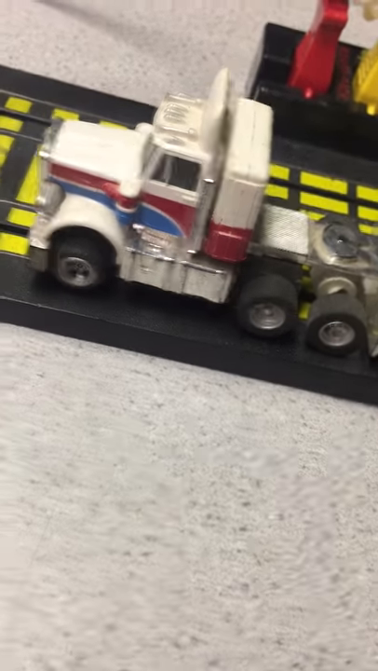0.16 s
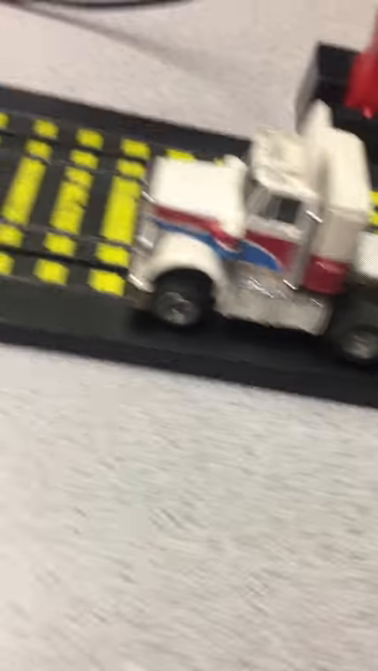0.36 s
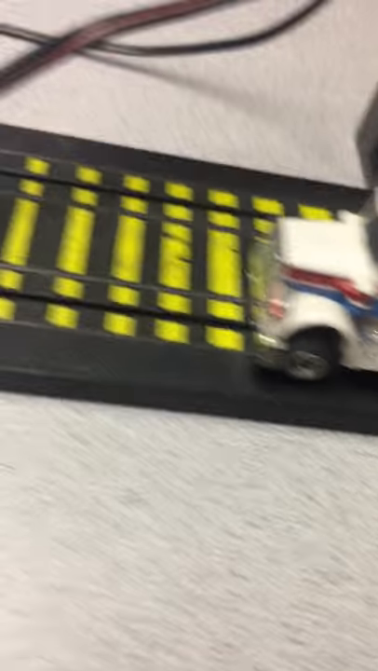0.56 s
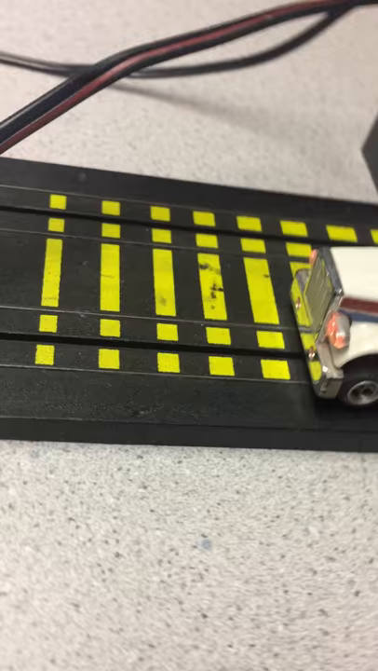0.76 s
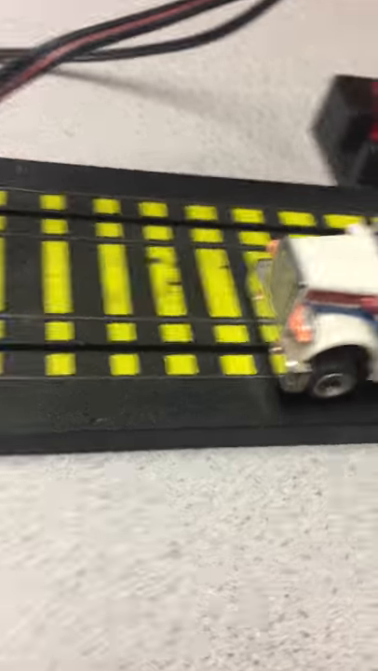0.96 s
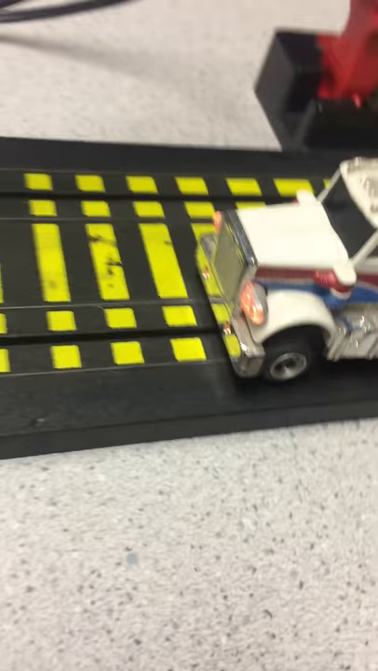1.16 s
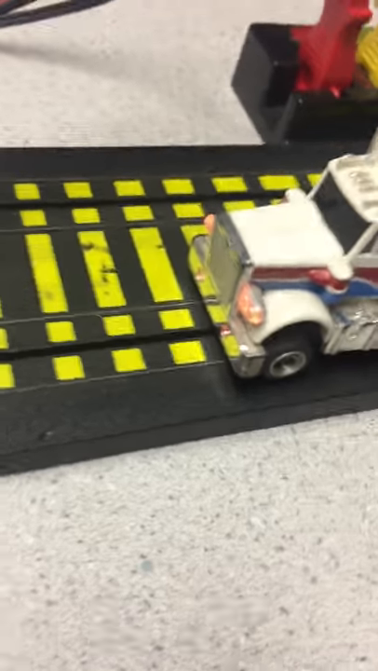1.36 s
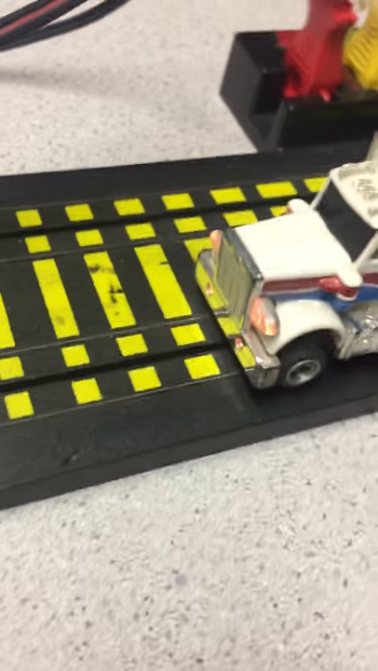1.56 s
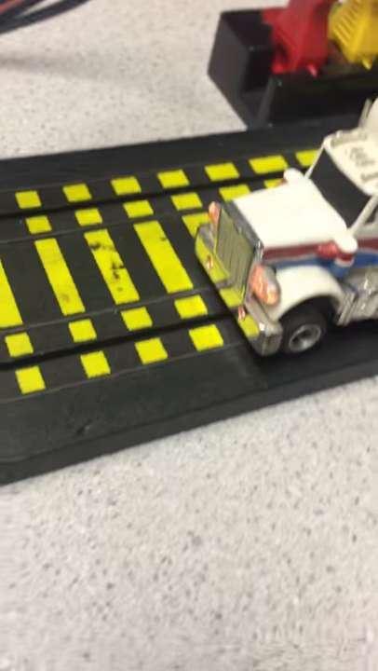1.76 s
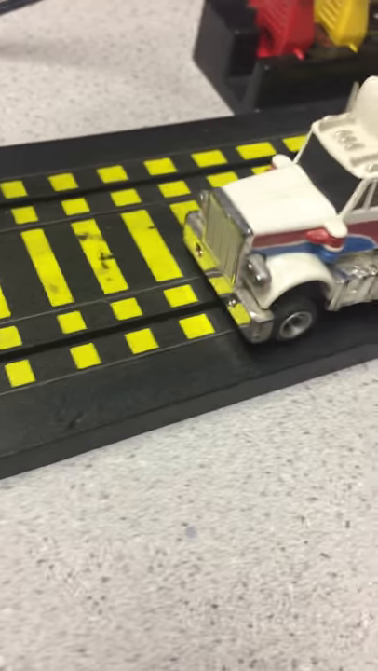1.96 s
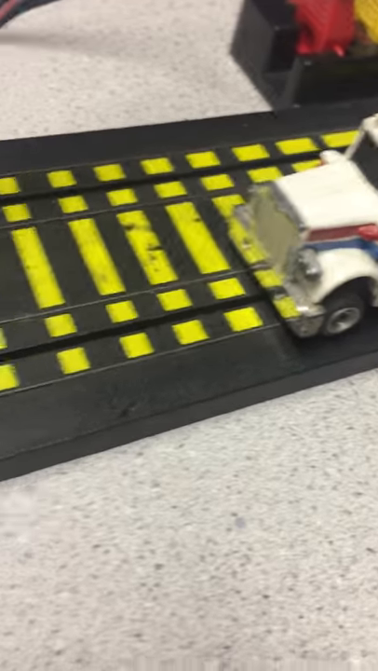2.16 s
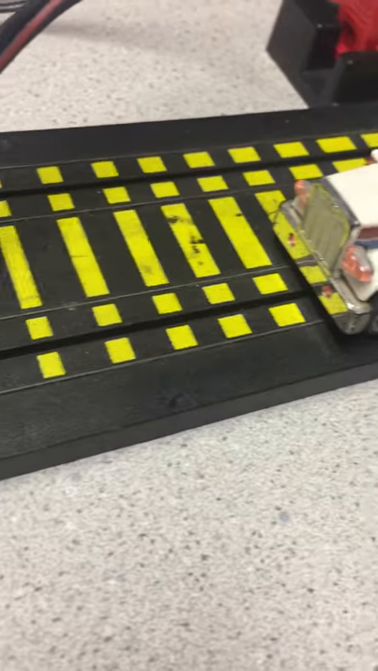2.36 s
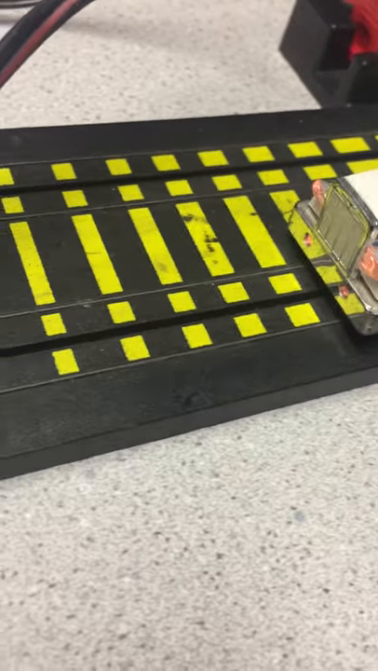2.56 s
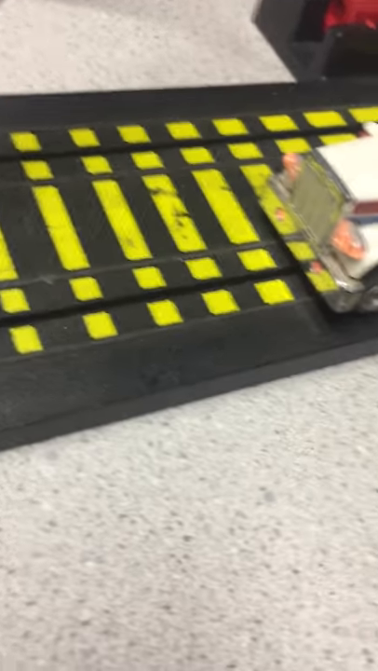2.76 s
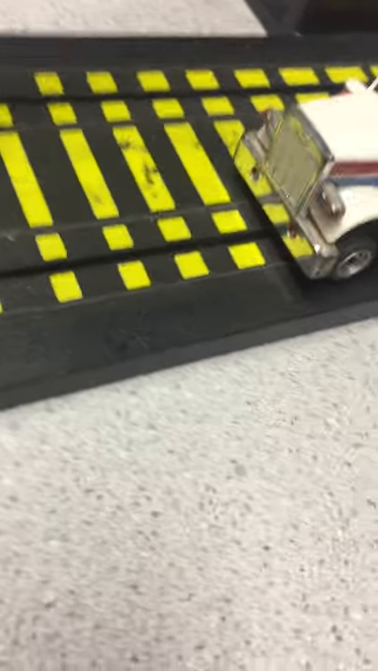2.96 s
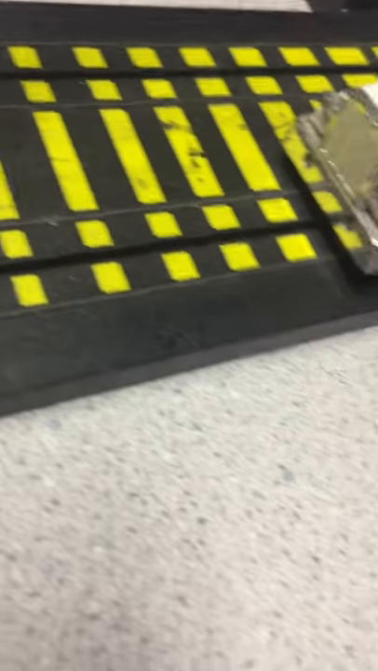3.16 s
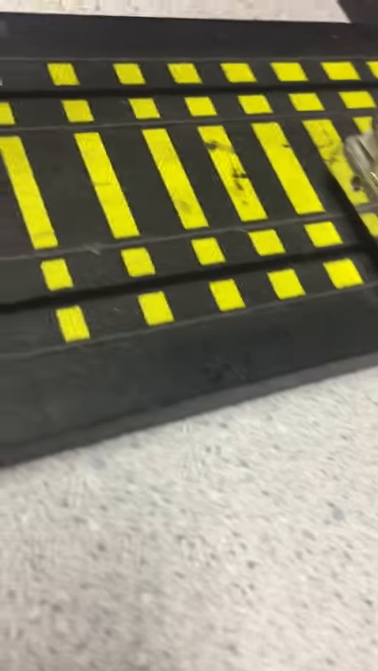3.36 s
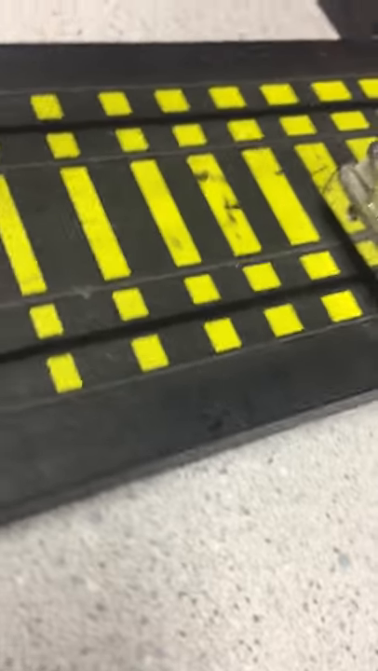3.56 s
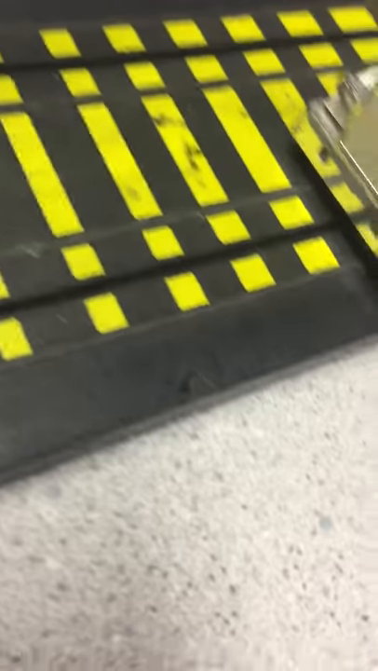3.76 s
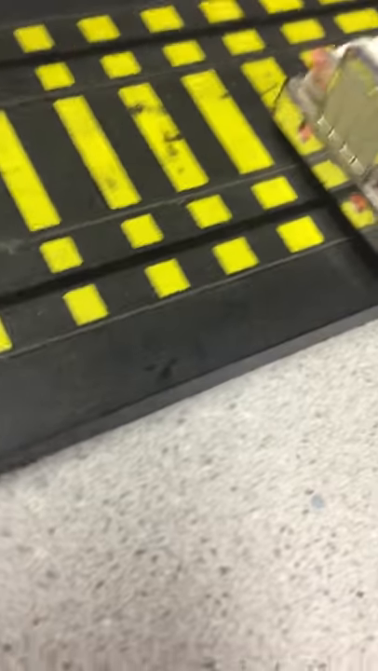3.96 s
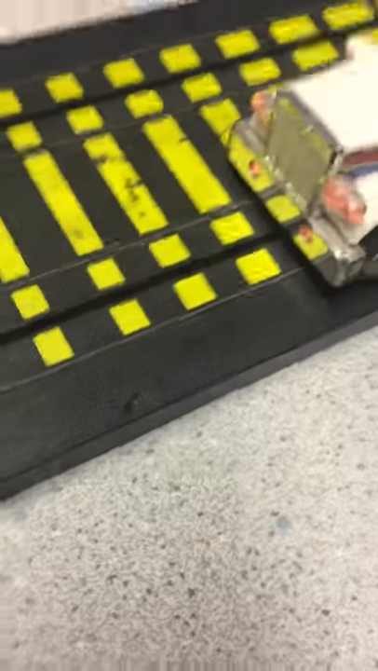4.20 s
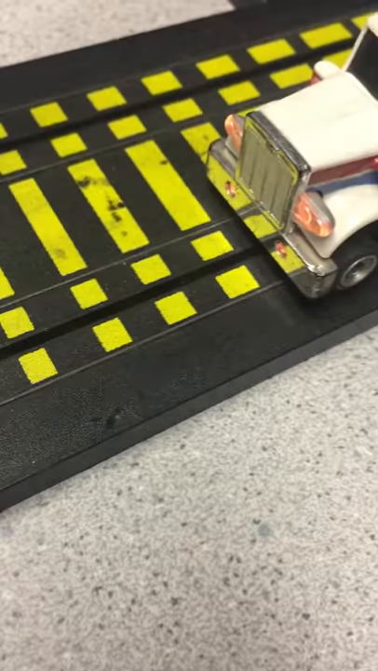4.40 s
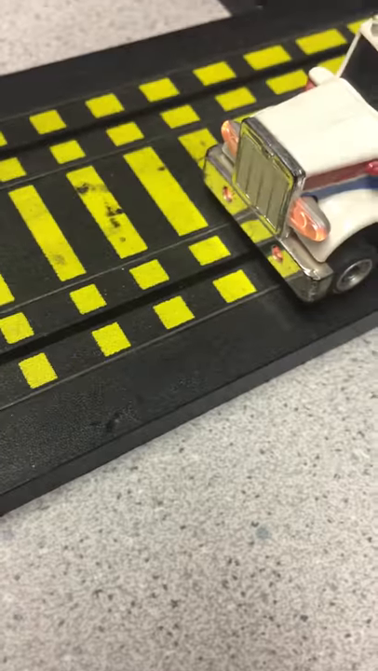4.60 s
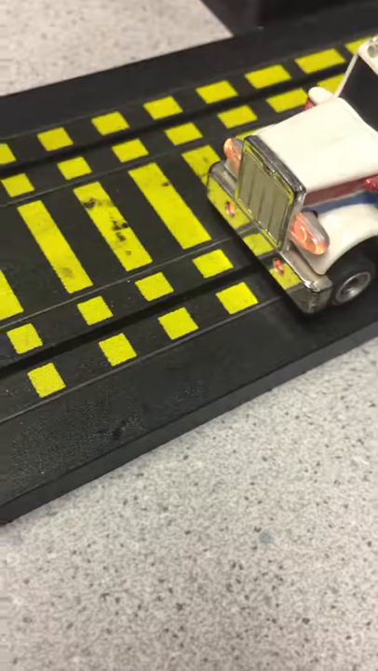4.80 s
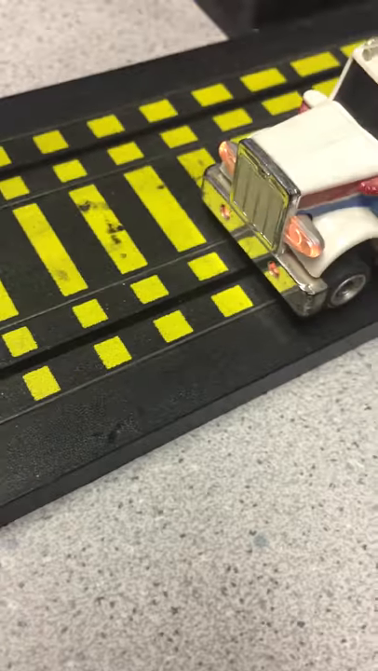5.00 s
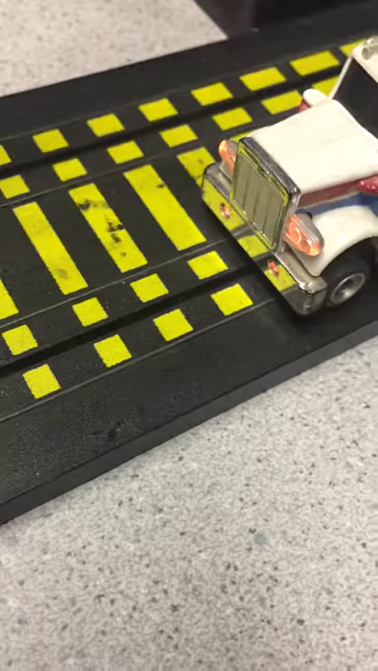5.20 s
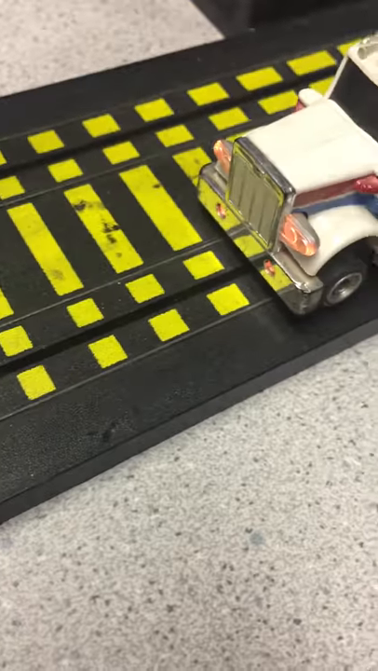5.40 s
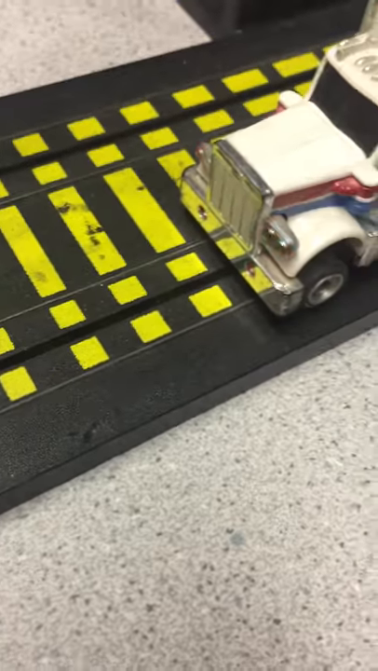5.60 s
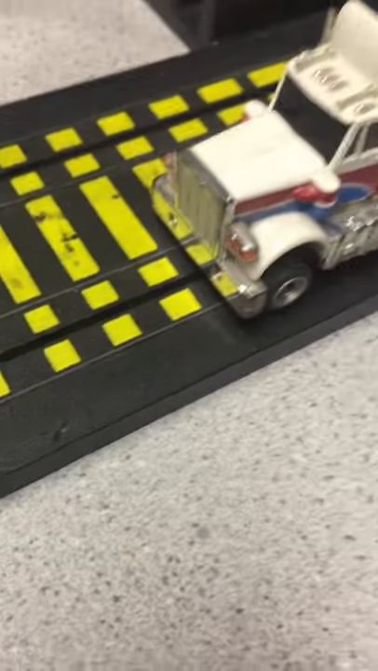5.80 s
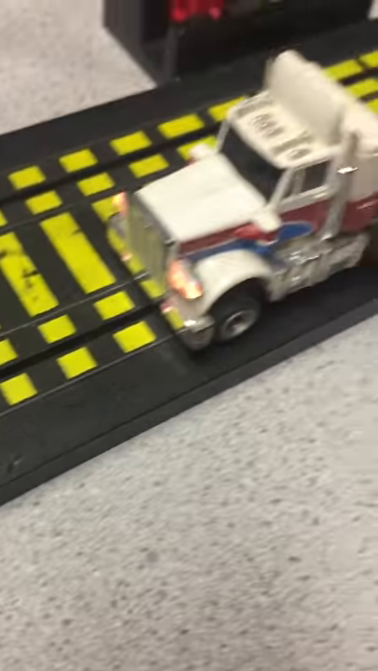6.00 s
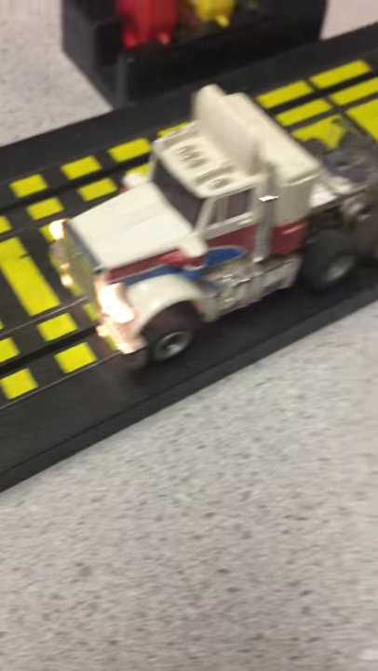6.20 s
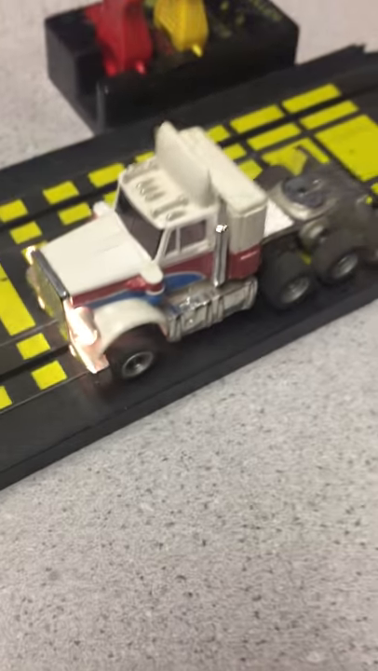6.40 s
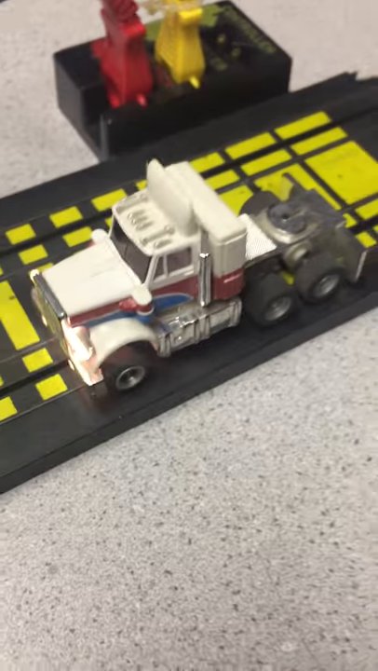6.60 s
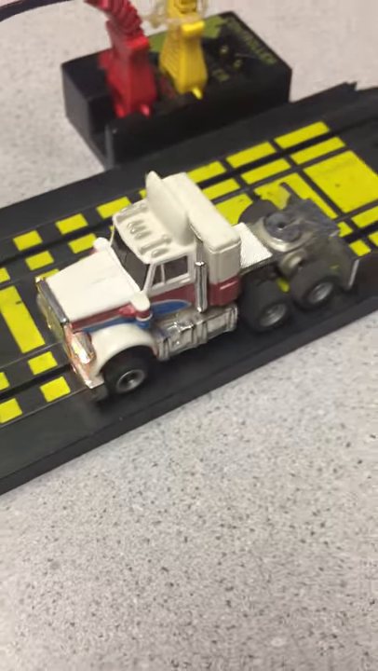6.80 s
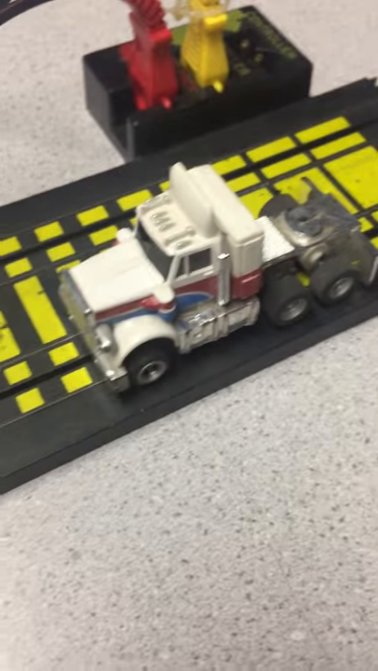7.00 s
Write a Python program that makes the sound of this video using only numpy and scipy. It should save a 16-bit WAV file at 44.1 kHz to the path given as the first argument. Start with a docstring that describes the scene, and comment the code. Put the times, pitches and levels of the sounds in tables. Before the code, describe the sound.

A toy slot truck moves along a plastic track indoors, close to a hand-held microphone. Its small motor and gears give a brief rattling buzz, then three longer runs, each with a scratchy metallic hiss and starting with a light click. In a pause midway, a hand softly bumps and rubs the microphone. The fifth and final run is the loudest and fastest, with a thin ringing tone that falls in pitch.

```python
"""Indoors, on a plastic track close to a hand-held microphone, a toy slot truck makes five short runs.
The impacts of the motor's loose gears force the chassis and the track into vibration, while sliding
friction makes the pickup shoes hiss on the rails and the guide pin ring in its slot.
The gears click as they take up their slack; in a pause a hand bumps and rubs the microphone's case."""
import sys
import numpy as np
from scipy import signal
from scipy.fft import rfft, irfft, next_fast_len
from scipy.io import wavfile
from scipy.ndimage import uniform_filter1d, map_coordinates

SR = 44100
rng = np.random.default_rng(int(sys.argv[2]) if len(sys.argv) > 2 else 0)


def generate_wav(signal):
    """Clip the signal to [-1, 1] and save it as 16-bit WAV at the path in sys.argv[1]."""
    frames = np.transpose(np.atleast_2d(signal))
    scaled = np.clip(frames, -1, 1) * 32767
    pcm = np.round(scaled).astype(np.int16)
    wavfile.write(sys.argv[1], SR, pcm)


N = 310921
TIME = np.arange(N) / SR

# squeezes of the throttle; the truck sits a little differently on the track each time:
# (on [s], off [s], spin-up time constant [s], run-down [s], full drive [dB],
# then relative to the drive: hum [dB], chassis [dB], track [dB], gear ring [dB], scrape [dB])
SQUEEZES = [(0.022, 0.192, .17, 0.13, -28, -27.5, -4, -17, -6.5, 0),
            (0.626, 1.945, .19, 0.18, -29, -34, -6, -14.5, -4, -1.5),
            (2.369, 3.013, .18, 0.2, -29, -34, -6, -13, -3.5, -1),
            (3.979, 5.607, .18, .2, -28.5, -26.5, -9.5, -7, -6, -1.5),
            (5.924, 7.012, .42, 0.13, -19, -29, -13, -11, -7.5, -0.5)]
# modes of the gears: (frequency [Hz], bandwidth [Hz], gain [dB])
GEAR_MODES = [(3400, 140, -3.5), (3512, 100, -1.5)]
# modes of the chassis and cab: (frequency [Hz], bandwidth [Hz], gain [dB])
CHASSIS_MODES = [(350, 37, -5), (576, 61, -16.5), (621, 96, 3.5), (853, 32.5, 6.5), (1211, 28, -1),
                 (1457, 86, 1.5), (2203, 79, -1.5), (2412, 195, 1), (3535, 84, 3), (4740, 45, -29)]
# modes of the track's panels: (frequency [Hz], bandwidth [Hz], gain [dB])
TRACK_MODES = [(620, 25, -9), (893, 22, 1), (1235, 264, 5.5), (1467, 56, 8), (1922, 305, 5.5),
               (2640, 480, 2), (2870, 160, -4), (3130, 120, -37), (3850, 200, -14.5)]
# spectrum of the track's low hum: (frequency [Hz], level [dB])
HUM_SPECTRUM = [(25, -17), (65, -2), (90, -1.5), (140, -6), (205, 8), (270, 0), (340, -1.5), (450, -33),
                (800, -20)]
# friction spectrum of the shoes on the rails: (frequency [Hz], level [dB])
SCRAPE_SPECTRUM = [(1500, -25.5), (2800, -1.5), (3900, 1), (4450, 5.5), (4830, -6.5), (5200, -0.5),
                   (6300, 4.5), (7100, -1), (8900, 0.5), (9700, 0), (10350, -6), (11000, -3), (13000, -6.5),
                   (14900, -4), (15650, -2)]
# crest of the hiss, wandering as the microphone moves; a list per later run: (time [s], frequency [Hz])
CREST_PATH = [
    [(0.75, 8270), (2.0, 8800)],
    [(2.5, 8600), (3.1, 9263)],
    [(4.2, 9220), (4.648, 8960), (5.65, 8940)],
    [(6.1, 8400), (6.204, 8820), (7.0, 8600)],
]
# modes of the slot's wall: (frequency [Hz], bandwidth [Hz], gain [dB])
SLOT_MODES = [(1218, 80, -11), (1494, 47, 4), (1820, 110, 2.5)]
# brief narrow-band swells: (start [s], end [s], level [dB], frequency [Hz])
BRIEF_SWELLS = [(0.1, 0.17, -60, 72), (2.63, 2.67, -55.5, 165), (4.34, 4.4, -49, 200),
                (5.945, 5.975, -48, 1020)]
# gear teeth snapping under load: (time [s], relative peak [dB], time constant [s])
TOOTH_SNAPS = [(0.0376, -32, 0.0072), (0.057, -21.5, 0.0021), (0.1654, -33, 0.0014), (0.6637, -34, 0.0028),
               (1.0136, -26, .0015), (2.396, -38, 0.0022), (2.4174, -26.5, 0.0099), (2.4578, -18, 0.0014),
               (2.4793, -18.5, 0.0019), (2.5296, -14, 0.00065), (4.002, -36, 0.0035),
               (4.0468, -26.5, 0.0018), (4.1155, -16.5, 0.0041), (6.2916, -19, 0.001)]
# gears taking up their slack: (time [s], peak [dB], main mode [Hz], gain of that mode [dB])
SLACK_CLICKS = [(0.613, -36, 2380, 19), (2.349, -31.5, 3620, 17), (3.3229, -30.5, 5100, 19.5),
                (3.348, -41, 5160, 17.5), (3.966, -38, 3500, 14), (5.877, -33, 3340, 19),
                (5.884, -34, 3300, 20)]
# modes common to all those clicks: (frequency [Hz], bandwidth [Hz], gain [dB])
SLACK_MODES = [(2580, 110, 14), (3100, 290, 24), (3280, 330, -1), (4200, 330, 5), (5100, 310, -20),
               (9600, 7000, -54)]
# bumps of the hand on the case: (time [s], peak [dB], contact time constant [s])
HAND_BUMPS = [(3.144, -24.5, 0.00075), (3.156, -35, 0.0044)]
# modes of the microphone's case: (frequency [Hz], bandwidth [Hz], gain [dB])
CASE_MODES = [(115, 55, -0.5), (260, 71, 13), (500, 100, 7.5)]
# spectrum of the room's background noise: (frequency [Hz], level [dB])
ROOM_SPECTRUM = [(15, -58), (25, -16), (34, -14), (45, -8), (93, -6), (126, -5), (209, -17), (523, -23.5),
                 (804, -17), (1110, -21), (15500, -36.5)]


def truck():
    """Forced vibration: one train of tooth impacts shakes the chassis, gears, track and shoes."""
    spin, drive, (hum_db, chassis_db, track_db, gears_db, scrape_db) = throttle()
    eased_db = 12 * np.maximum(TIME - 6.4, 0)  # the last, hardest squeeze is slowly relaxed
    drive = drive * amp(-eased_db)
    speed = np.clip(drive / amp(-24), .03, 1.3) ** .3
    force = tooth_force(speed, tooth_hz=560, scatter_db=3.0, decay_s=0.00072, rubbing=0.44)
    chassis = amp(chassis_db + 0.49 * eased_db) * rattle(force, CHASSIS_MODES, edge_hz=455)
    gears = amp(gears_db) * rattle(force, GEAR_MODES, edge_hz=1600)
    crawl = 1 - spin  # at a crawl the track's hum and knocking take a larger share
    hum = amp(hum_db + 9.5 * crawl) * coloured(shake(force), HUM_SPECTRUM)
    track = amp(track_db + 6 * crawl) * unit(ringing(shake(force), TRACK_MODES))
    # plastic damps the treble of its own ringing
    plastic = filtered(chassis + gears + hum + track, lambda hz: 1 / np.sqrt(1 + (hz / 4700) ** 10))
    scrape = amp(scrape_db) * spin / (spin + 0.28) * pickup_shoes(force, speed)
    return drive * (plastic + scrape) + spin * guide_pin(force) + brief_swells(force) + coasting_shoes()


def throttle():
    """Inertia makes the motor lag each squeeze: share of full speed, drive, and the five parts' dB."""
    spin, drive, parts_db = np.zeros(N), np.zeros(N), np.zeros((5, N))
    for on, off, spin_up, run_down, full_db, *shares_db in SQUEEZES:
        up = 1 - np.exp(-np.maximum(TIME - on, 0) / spin_up)
        down = np.clip(1 - (TIME - off) / run_down, 0, 1) ** 1.5
        spin += up * down
        drive += amp(full_db) * up * down
        parts_db[:, TIME >= on] = np.array(shares_db)[:, None]
    return spin, drive, parts_db


def tooth_force(speed, tooth_hz, scatter_db, decay_s, rubbing):
    """Incoherent sources add in energy: uneven impacts, denser with speed, plus steady rubbing."""
    teeth_passed = np.cumsum(tooth_hz * speed * amp(3 * wobble(250))) / SR
    hits = np.flatnonzero(np.diff(np.floor(teeth_passed)))
    energy = np.zeros(N)
    energy[hits] = amp(scatter_db * np.clip(rng.standard_normal(len(hits)), -2, 2)) ** 2
    energy = signal.lfilter([1], [1, -np.exp(-1 / (decay_s * SR))], energy)
    energy /= np.abs(uniform_filter1d(energy, size=3000)) + 1e-9
    return np.sqrt(energy + rubbing)


def shake(force):
    """Random excitation: fresh noise, amplitude-modulated by the tooth force."""
    return force * rng.standard_normal(N)


def rattle(force, modes, edge_hz):
    """Modal radiation: a shaken part sounds at its resonances above an edge; rms 1."""
    return unit(radiated(ringing(shake(force), modes), edge_hz, order=2))


def pickup_shoes(force, speed):
    """Friction noise of shoes skipping on rails: the treble grows with speed and flickers with contact."""
    hiss = unit(track_reflection(coloured(shake(force), SCRAPE_SPECTRUM)))
    hiss += amp(-13.5) * gliding(shake(force), crest_hz(), width_hz=520)
    dull = filtered(hiss, lambda hz: 1 / (1 + (hz / 9500) ** 4))
    flicker = amp(1.43 * wobble(170))
    return dull + amp(5.5) * (hiss - dull) * speed * flicker


def track_reflection(x):
    """Interference with a delayed copy off the track makes a comb, its fifth peak at the crest."""
    delay_s = 5 / crest_hz()
    return x + .33 * map_coordinates(x, [(TIME - delay_s) * SR], order=3)


def crest_hz():
    """Frequency at which direct and reflected hiss reinforce, shifting with their path difference."""
    return np.interp(TIME, *np.vstack(CREST_PATH).T)


def guide_pin(force):
    """Friction excites resonance: in the fastest run the pin rings, falling in pitch, then its slot."""
    pin_hz = 3199 - 910 * np.maximum(TIME - 6.32, 0)
    pin = gliding(shake(force), pin_hz, width_hz=93)
    pin *= swell(6.27, 6.32, db=-24.5, rise_db_s=59.4, fall_db_s=39)
    slot = unit(ringing(shake(force), SLOT_MODES))
    slot *= swell(6.5, 6.6, db=-29.5, rise_db_s=30, fall_db_s=350)
    return pin + slot


def gear_clicks():
    """Impact excitation: teeth snap hard under load and click lightly as their backlash closes."""
    out = np.zeros(N)
    for time, db, decay_s in TOOTH_SNAPS:
        blow = burst(decay_s)
        snap = unit(ringing(blow, CHASSIS_MODES)) + coloured(blow, SCRAPE_SPECTRUM)
        add(out, time, db - 1.5, snap)
    for time, db, ring_hz, ring_db in SLACK_CLICKS:
        # a light contact, then a faint shiver as the teeth settle
        contact = burst(decay_s=.0012) + amp(-16) * burst(decay_s=.007)
        contact *= 1 - np.exp(-TIME[:len(contact)] / 0.00088)
        modes = list(SLACK_MODES) + [(ring_hz, 0.074 * ring_hz, ring_db)]
        add(out, time, db, radiated(ringing(contact, modes), edge_hz=430, order=3))
    return out


def brief_swells(force, width_hz=35):
    """Narrow-band noise, briefly swelling: a low handling rumble, two short hums and a soft scrape."""
    excitation = shake(force)
    out = np.zeros(N)
    for start, end, db, hz in BRIEF_SWELLS:
        band = unit(ringing(excitation, [(hz, width_hz, 0)]))
        out += swell(start, end, db, rise_db_s=600, fall_db_s=600) * band
    return out


def coasting_shoes():
    """Sliding friction: the shoes hiss faintly after the first run."""
    hiss = track_reflection(coloured(rng.standard_normal(N), SCRAPE_SPECTRUM))
    envelope = swell(.54, .63, db=-70, rise_db_s=17, fall_db_s=450)
    return envelope * unit(radiated(hiss, edge_hz=5600, order=1))


def hand():
    """Structure-borne sound: a rub and two bumps pass through the case; a longer contact is duller."""
    pressure = swell(3.41, 3.68, db=-57, rise_db_s=200, fall_db_s=490) * amp(2.5 * wobble(35))
    out = pressure * unit(through_case(rng.standard_normal(N), edge_hz=370))
    for time, db, contact_s in HAND_BUMPS:
        push = burst(contact_s)
        push *= 1 - np.exp(-TIME[:len(push)] / (0.16 * contact_s))
        add(out, time, db, through_case(push, edge_hz=520 + 0.55 / contact_s))
    return out


def through_case(x, edge_hz):
    """A mechanical low-pass: the case rings in its low modes and transmits little above its edge."""
    vibration = ringing(x, CASE_MODES)
    return filtered(vibration, lambda hz: 1 / (1 + np.sqrt(2) * 1j * hz / edge_hz - (hz / edge_hz) ** 2))


def reverberation(x, t60):
    """Diffuse reflections off the floor and walls decay exponentially, their treble softened."""
    t = TIME[:SR // 2]
    tail = rng.standard_normal(len(t)) * amp(-60 * t / t60) * (t > .004)
    wet = signal.fftconvolve(x, tail / np.linalg.norm(tail))[:N]
    return filtered(wet, lambda hz: 1 / (1 + 1j * hz / 5000))


def ringing(x, modes):
    """Modal superposition: the responses of damped resonators to x add."""
    return filtered(x, lambda hz: sum(amp(db) * 1j * hz * width / (centre ** 2 - hz ** 2 + 1j * hz * width)
                                      for centre, width, db in modes))


def gliding(x, centre_hz, width_hz):
    """Time-varying resonance: x through one band with a moving centre; rms 1."""
    hz, t, spectra = signal.stft(x, SR, nperseg=512)
    detuning = (hz[:, None] - np.interp(t, TIME, centre_hz)) / width_hz
    return unit(signal.istft(spectra / (1 + 1j * detuning) ** 2, SR, nperseg=512)[1][:N])


def radiated(x, edge_hz, order):
    """Radiation efficiency: small parts give off little sound below an edge frequency."""
    return signal.sosfilt(signal.butter(order, edge_hz, "high", fs=SR, output="sos"), x)


def coloured(x, points):
    """Spectral shaping of x by (frequency [Hz], level [dB]) points; rms 1."""
    knots_hz, db = np.transpose(points)
    return unit(filtered(x, lambda hz: amp(np.interp(np.log(hz + 1), np.log(knots_hz), db))))


def filtered(x, response):
    """Linear filtering: the spectrum of x times a complex frequency response."""
    size = next_fast_len(len(x) + SR // 4)
    return irfft(rfft(x, size) * response(np.fft.rfftfreq(size, 1 / SR)), size)[:len(x)]


def swell(start, end, db, rise_db_s, fall_db_s):
    """Exponential growth until start, a steady level until end, then exponential decay."""
    return amp(db - rise_db_s * np.maximum(start - TIME, 0) - fall_db_s * np.maximum(TIME - end, 0))


def burst(decay_s):
    """A transient: noise under an exponential decay."""
    t = TIME[:SR // 8]
    return rng.standard_normal(len(t)) * np.exp(-t / decay_s)


def wobble(rate):
    """Smooth random modulation with rate knots a second."""
    return map_coordinates(rng.standard_normal(int(N * rate / SR) + 4), [TIME * rate])


def add(out, time, peak_db, sound):
    """Superpose a sound on out at a given time and peak level."""
    part = out[round(time * SR):][:len(sound)]
    part += (amp(peak_db) * sound / np.abs(sound).max())[:len(part)]


def amp(db):
    """Amplitude ratio of a level in decibels."""
    return 10 ** (np.asarray(db) / 20)


def unit(x):
    """Normalisation to rms 1."""
    return x / np.sqrt(np.mean(x ** 2) + 1e-20)


def scene():
    """Superposition of the toy, its reverberation, the hand and the room's steady noise."""
    toy = truck() + gear_clicks()
    room_noise = amp(-68) * coloured(rng.standard_normal(N), ROOM_SPECTRUM)
    return (toy + amp(-12) * reverberation(toy, t60=0.078) + hand() + room_noise)[None]


def record(dry):
    """Band limiting: the deepest bass rolls off and the highest treble is cut."""
    low_cut = lambda hz: (1j * hz / (35 + 1j * hz)) ** 2
    high_cut = lambda hz: np.clip((15780 - hz) / 250 + .5, 0, 1)
    return filtered(dry[0], lambda hz: low_cut(hz) * high_cut(hz))[None]


dry = scene()
out = record(dry)
generate_wav(out)
```